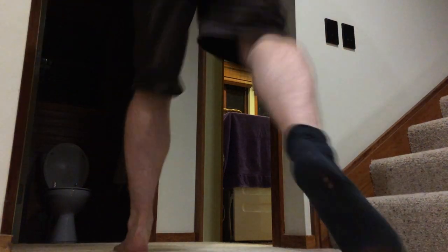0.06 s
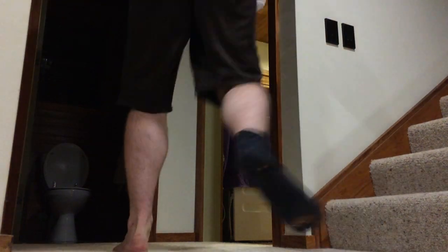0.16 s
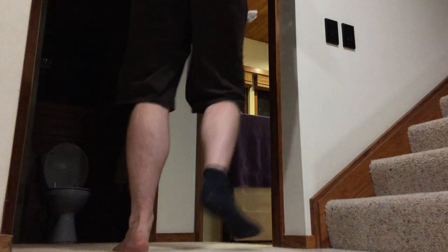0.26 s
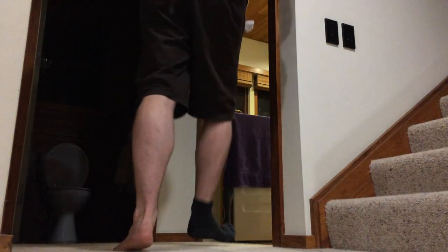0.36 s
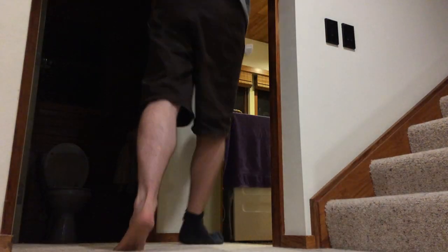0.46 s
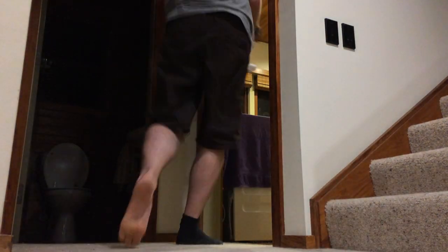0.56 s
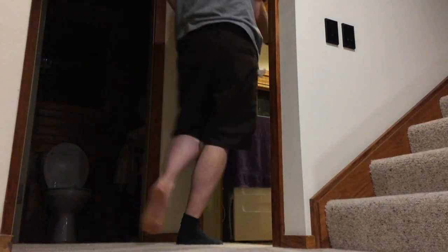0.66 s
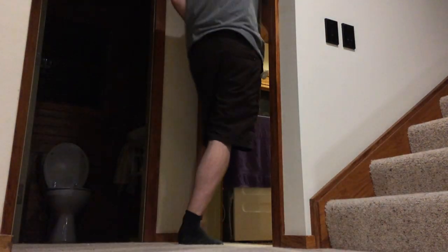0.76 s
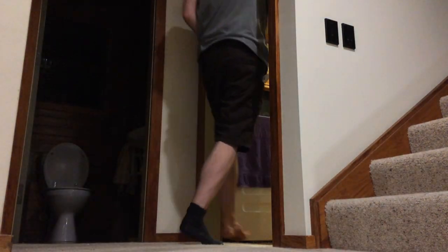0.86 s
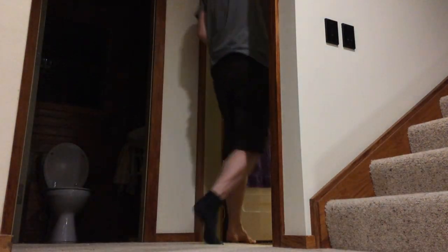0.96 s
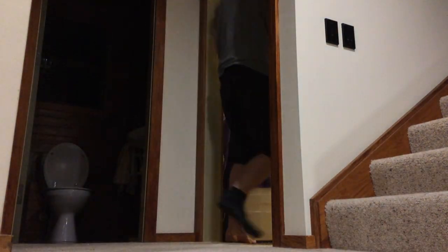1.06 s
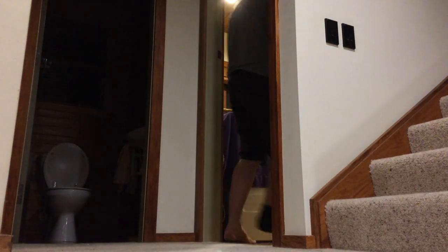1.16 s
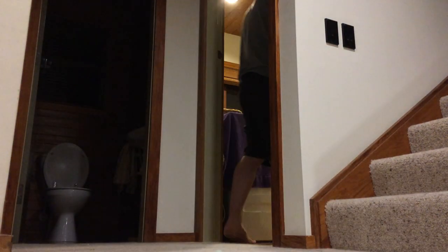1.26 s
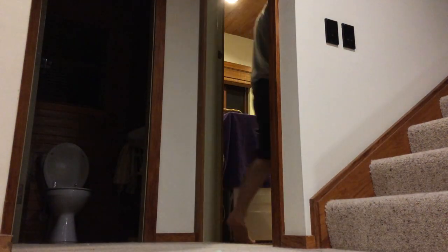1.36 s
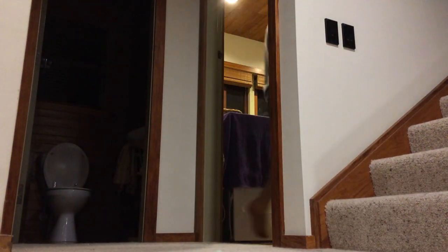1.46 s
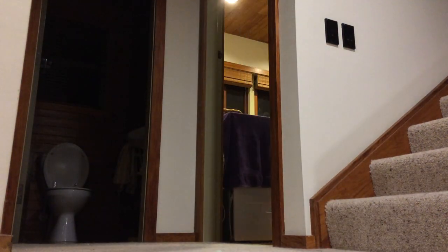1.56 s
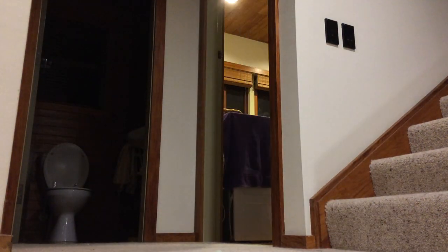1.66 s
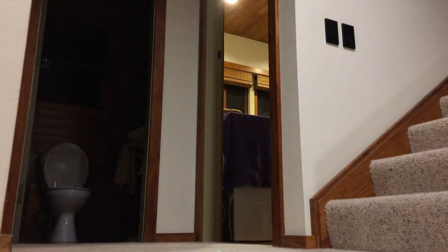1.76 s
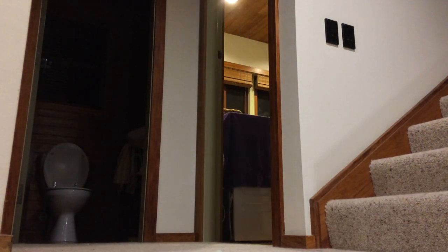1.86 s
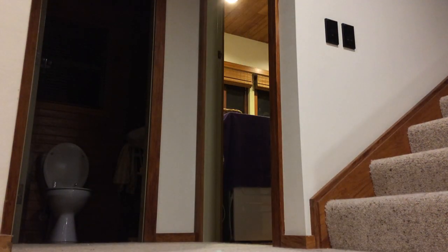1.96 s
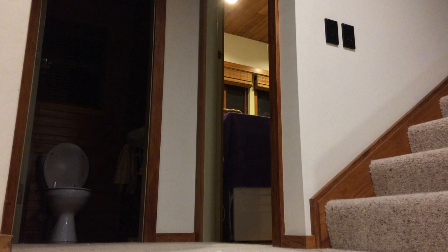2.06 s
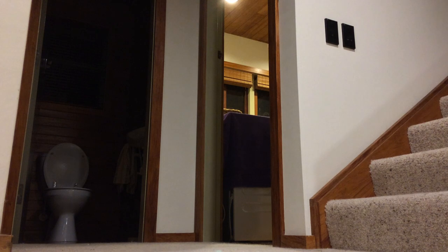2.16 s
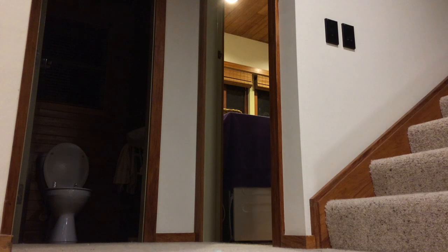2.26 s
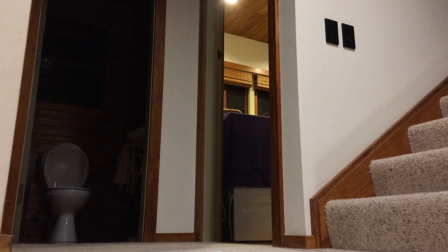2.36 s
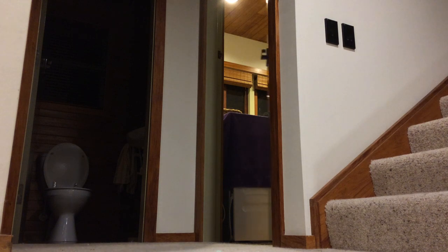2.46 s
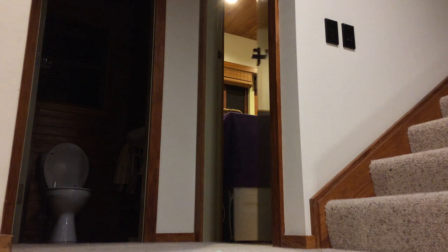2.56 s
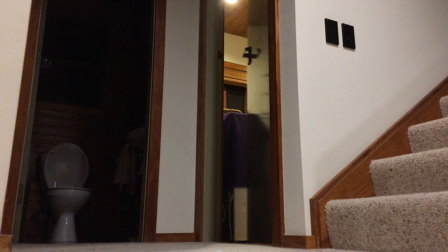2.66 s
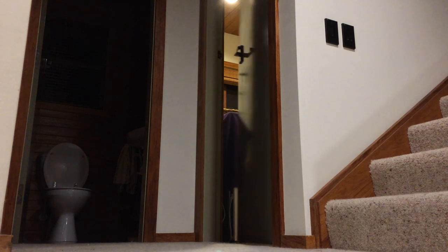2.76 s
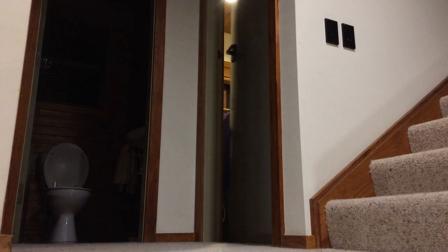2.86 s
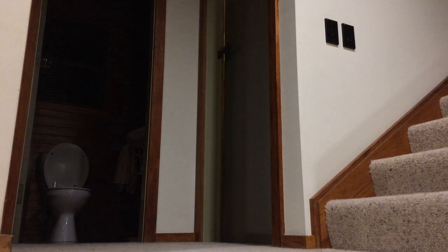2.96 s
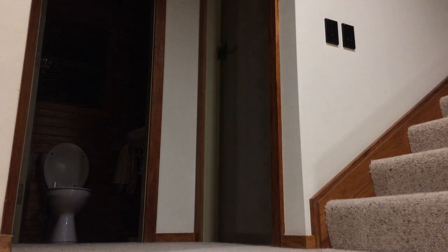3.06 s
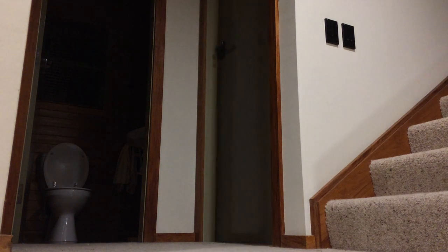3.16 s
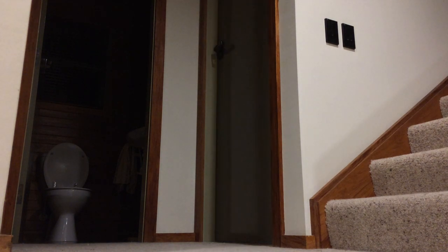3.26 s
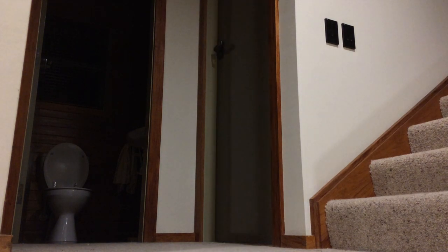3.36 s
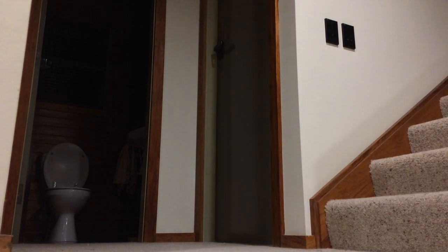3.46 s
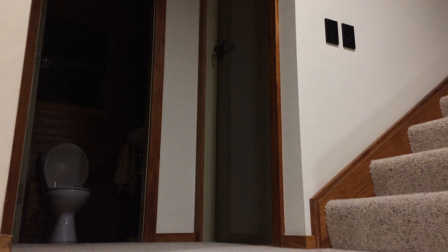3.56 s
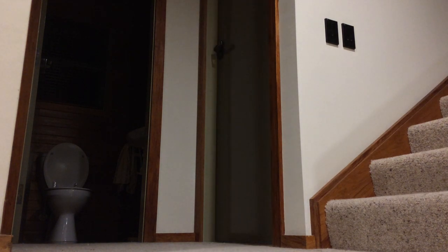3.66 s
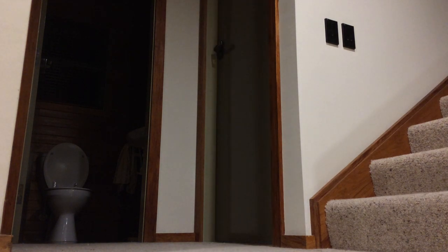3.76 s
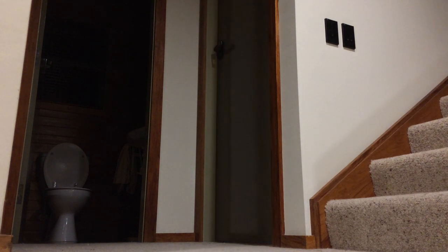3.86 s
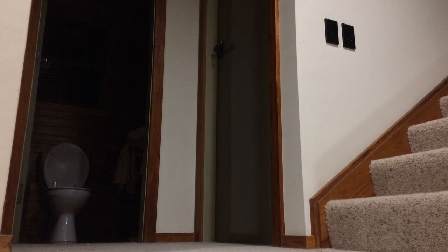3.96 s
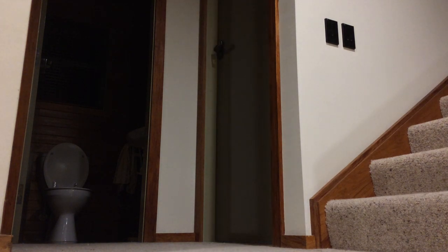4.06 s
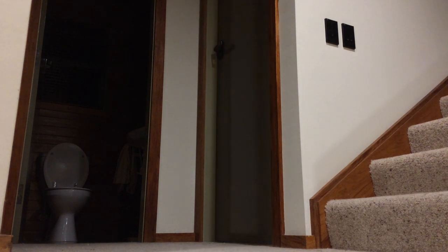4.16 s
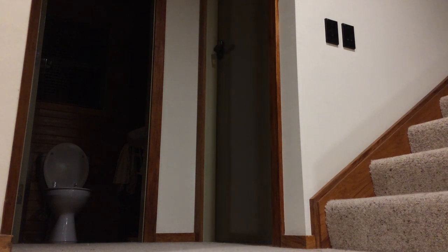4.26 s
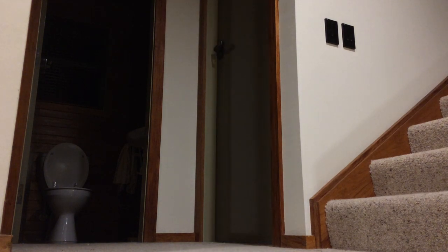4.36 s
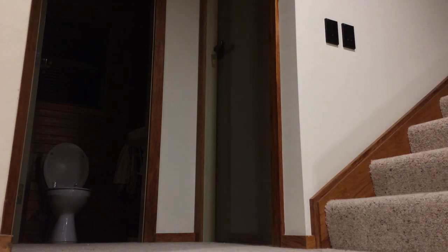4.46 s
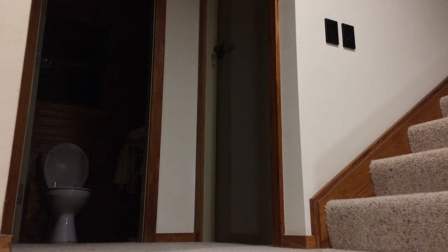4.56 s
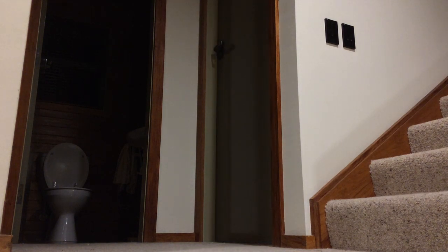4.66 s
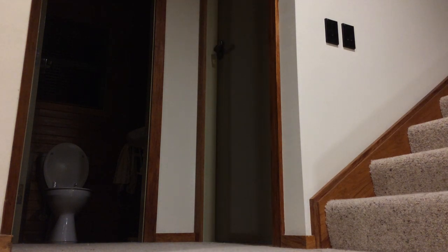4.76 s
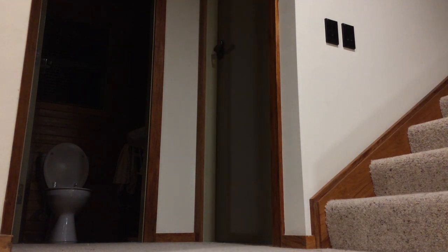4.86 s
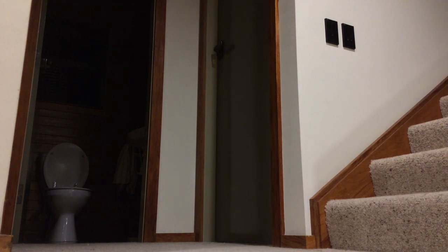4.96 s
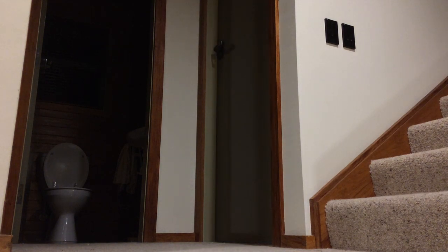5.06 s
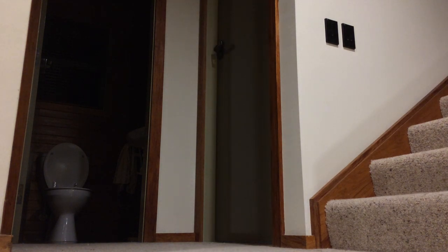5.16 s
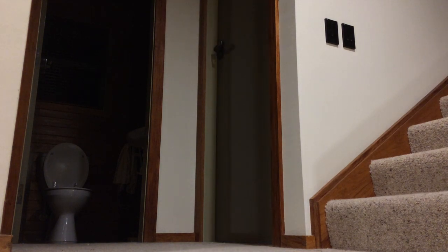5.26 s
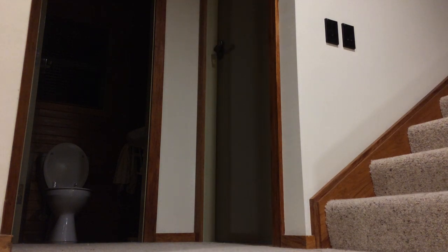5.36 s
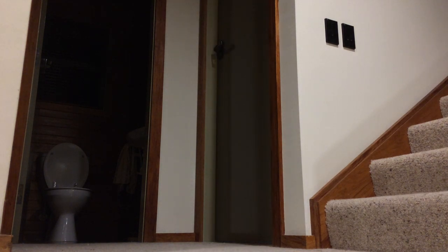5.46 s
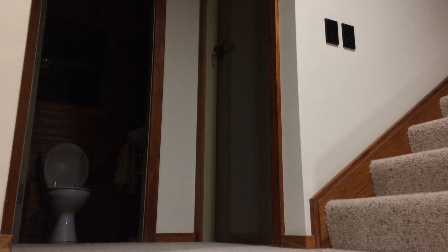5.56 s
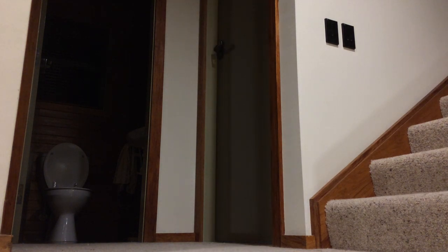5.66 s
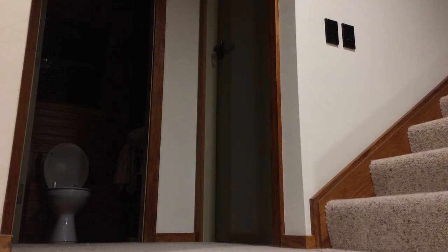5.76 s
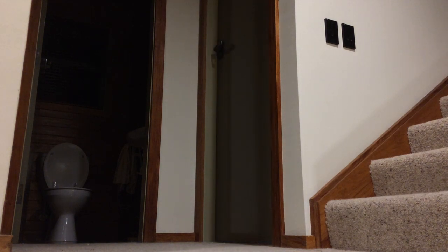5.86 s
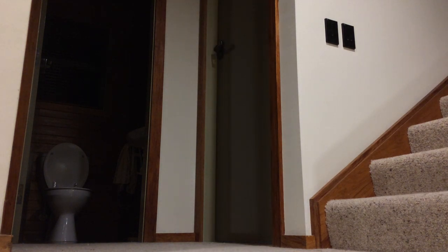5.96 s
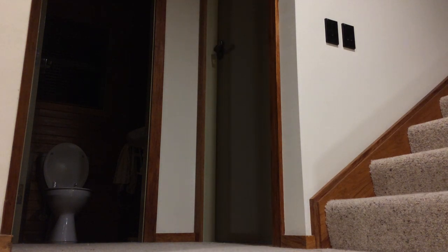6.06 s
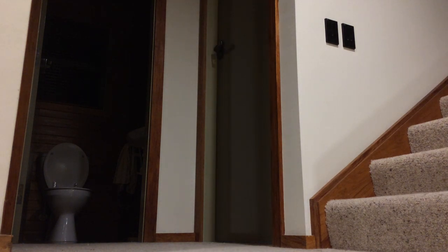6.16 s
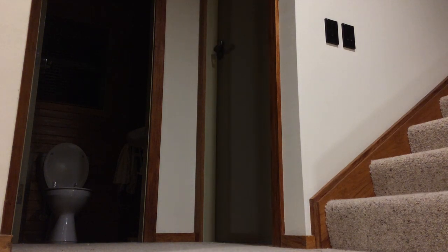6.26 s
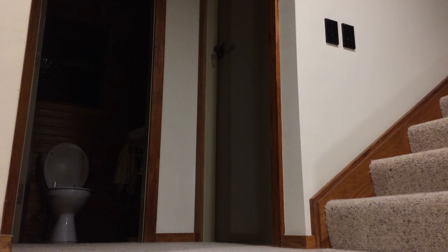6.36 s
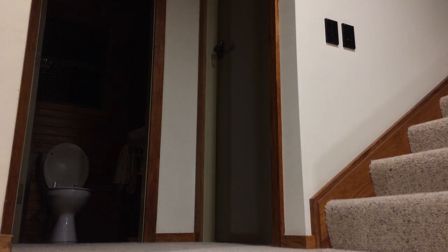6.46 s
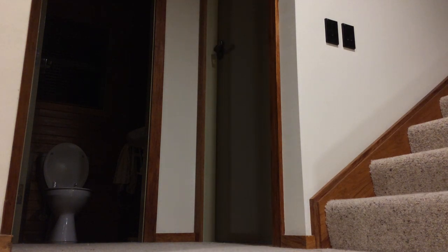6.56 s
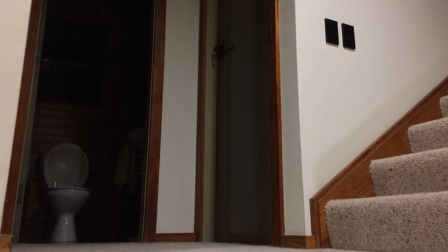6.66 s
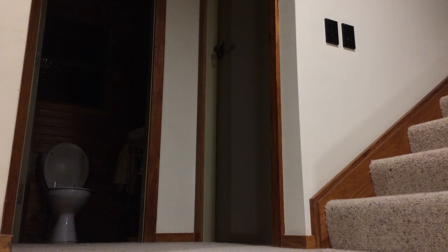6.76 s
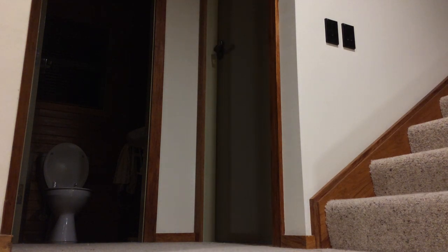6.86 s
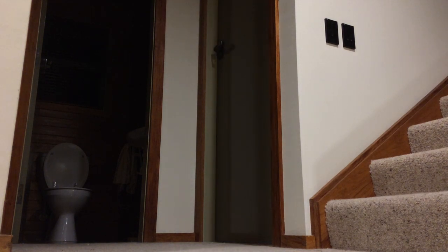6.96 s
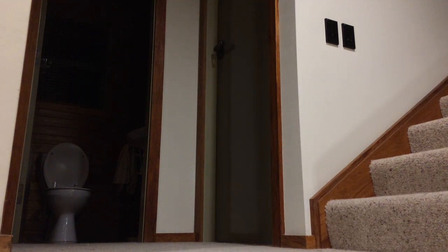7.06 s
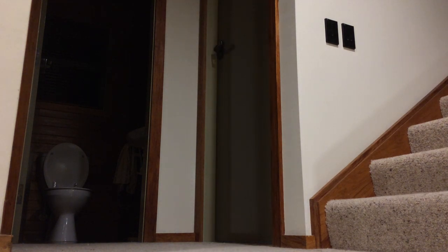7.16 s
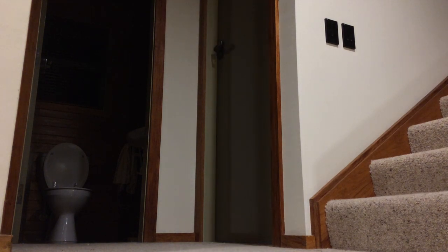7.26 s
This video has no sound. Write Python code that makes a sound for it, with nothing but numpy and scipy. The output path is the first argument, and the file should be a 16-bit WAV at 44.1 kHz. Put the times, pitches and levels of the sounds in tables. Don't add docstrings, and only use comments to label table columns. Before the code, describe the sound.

Someone pads away over creaky carpeted boards, a door rubs faintly, knocks and bangs shut hard, leaving dull thumps behind it in a quiet house.

```python
import sys
import numpy as np
from scipy import signal
from scipy.fft import rfft, irfft
from scipy.io import wavfile
from scipy.ndimage import uniform_filter1d

SR = 44100
rng = np.random.default_rng(int(sys.argv[2]) if len(sys.argv) > 2 else 0)


def to_linear_factor(level_db):
    exponent = np.asarray(level_db, float) / 20
    return 10 ** exponent


def bounce(signal):
    frames = np.transpose(np.atleast_2d(signal))
    limited = np.clip(frames, -1, 1)
    pcm = np.round(limited * 32767).astype(np.int16)
    wavfile.write(sys.argv[1], SR, pcm)


N = 322371
T = np.arange(N) / SR
HALF = SR // 2
T_HALF = T[:HALF]
DECADE = np.log(1000)
SHUT_S = 3.3


def unit(x):
    return x / np.sqrt(np.mean(x ** 2))


def coloured(db_of_hz, size=N):
    hz = np.maximum(np.arange(size // 2 + 1) * SR / size, 1)
    spectrum = rfft(rng.standard_normal(size)) * to_linear_factor(db_of_hz(hz))
    return unit(irfft(spectrum, size))


def table(points):
    hz, db = np.transpose(points)
    return lambda f: np.interp(np.log(f), np.log(hz), db)


def hump(centre_hz, octaves):
    return lambda f: np.maximum(-12 * (np.log2(f / centre_hz) / octaves) ** 2, -150)


def ring(force, modes):
    out = 0
    for k, (hz, db, t60) in enumerate(modes):
        pole = np.exp(2j * np.pi * hz / SR - DECADE / (t60 * SR))
        mode = signal.lfilter([1], [1, -pole], force).imag
        out = out + (-1) ** k * to_linear_factor(db) * mode
    return out


def add(out, s, sound):
    i = int(s * SR)
    out[i:i + len(sound)] += sound[:N - i]


def burst(rise_ms, t60):
    rise = 1 - np.exp(-(T_HALF * 1000 / rise_ms) ** 2)
    shape = rise * np.exp(-DECADE * T_HALF / t60)
    return shape / shape.max()


def thud(out, s, db, hz, t60, rise_ms, way=1, grit=0):
    sag_s = 0.0016 * (1 - np.exp(-T_HALF / 0.0097))
    rough = np.clip(grit + (hz - 70) / 160, 0, .7)
    tone = way * np.sin(2 * np.pi * hz * (T_HALF + sag_s))
    rumble = coloured(hump(hz, 0.46), size=HALF)
    add(out, s, to_linear_factor(db) * burst(rise_ms, t60) * ((1 - rough) * tone + rough * rumble))


# start in seconds, body level in dB, crack level in dB, contact in ms, direction.
LEAF_KNOCKS = [(3.038, -47.5, -77, 0.4, -1), (3.044, -45, -79, 0.31, -1), (3.052, -50, -77.5, 2.3, 1),
               (3.127, -23.5, -13.5, 1.09, -1), (3.1297, -18, -21.5, 0.8, 1), (3.1348, -19, -27, 0.75, 1),
               (3.146, -25.5, -35, 0.19, -1), (3.174, -19, -32.5, 0.54, 1), (3.207, -30, -49, 4.1, -1),
               (3.323, -23.5, -48, 1.6, -1), (3.33, -19.5, -18.5, 1.2, 1), (3.3371, -9.5, -20, 1.1, -1),
               (3.3393, -14, -26, 0.67, -1), (3.348, -14.5, -20.5, 0.7, -1),
               (3.3517, -12.5, -17.5, 0.43, 1), (3.358, -21, -24.5, 1.2, 1), (3.366, -26.5, -31, 1.1, -1)]
# frequency in Hz, level in dB, t60 in seconds.
LEAF_MODES = [(135, -3, 0.15), (161.3, -9, 0.33), (219, 0, 0.053), (275, -1, 0.16), (344.5, -1, 0.17),
              (430.5, -2.5, .1), (507, -2.5, 0.046), (600, -5, 0.032), (760, -8, 0.051), (858, -9, 0.082),
              (925.3, -3, 0.063), (1064, -6, .05), (1238, -7.5, 0.018), (1404, -10, 0.016),
              (1730, -12, 0.0077), (2386, -19.5, 0.027), (2840, -14.5, .04)]
# frequency in Hz, density in dB per Hz.
KNOCK_CRACK = [(180, -20.5), (300, -10), (1060, -9.5), (1460, -13.5), (2280, -19.5), (4500, -16.5),
               (5100, -24.5), (11300, -26), (14500, -34.5), (16000, -56.5)]
# frequency in Hz, density in dB per Hz.
SLAM_CRACK = [(180, -34), (300, -26.5), (470, -15), (689, -19.5), (1000, -9), (1720, -15), (1970, -21.5),
              (2880, -20.5), (5600, -28), (14200, -32.5), (16000, -57)]
RATTLE_S, RATTLE_S_PER_MS = .012, 0.027


def door():
    push, crack = np.zeros(N), np.zeros(N)
    for s, body_db, crack_db, contact_ms, way in LEAF_KNOCKS:
        blow = np.hanning(int(contact_ms * SR / 1000) + 3)
        add(push, s, way * to_linear_factor(body_db) * blow / blow.sum())
        grains = to_linear_factor(4.0 * coloured(hump(250, 1.0), size=HALF))
        splinter = coloured(table(KNOCK_CRACK if s < SHUT_S else SLAM_CRACK), size=HALF)
        rattle = burst(.4, RATTLE_S + RATTLE_S_PER_MS * contact_ms)
        add(crack, s, to_linear_factor(crack_db) * rattle * grains * splinter)
    return ring(push, LEAF_MODES), crack


LATCH_STRIKES = [
    3.129,
    3.176,
]
# frequency in Hz, level in dB, t60 in seconds.
LATCH_MODES = [(2950, -7, .04), (3420, -8, .03), (4020, -6, .03), (4560, 0, .07), (4640, -5, .05),
               (5280, -4, .04)]


def latch():
    tongue = np.zeros(N)
    for s, db in zip(LATCH_STRIKES, (-49, -57)):
        add(tongue, s, to_linear_factor(db) * burst(0.77, .07) * rng.standard_normal(HALF))
    return ring(tongue, LATCH_MODES)


# start in seconds, level in dB, pitch in Hz, rise in ms, direction.
WALL_BOOMS = [(3.04, -52, 71.6, 9.9, 1), (3.138, -19.5, 75.2, 38, 1), (3.327, -7, 69.7, 3.8, 1),
              (3.35, -3.5, 64.96, 1.5, 1), (3.3588, 2.5, 76.3, 3.4, -1), (3.381, -10, 135, 16, 1),
              (3.398, -8.5, 73, 5.7, -1), (3.428, -16.5, 65.8, 10.8, 1), (3.552, -30, 67.24, 15.2, 1),
              (3.629, -36, 73.8, 14, 1), (3.74, -39, 75.75, 19, 1)]
T60_S_PER_RISE_MS = 0.0071
WALL_T60_S = .09


def wall():
    out = np.zeros(N)
    for s, db, hz, rise_ms, way in WALL_BOOMS:
        thud(out, s, db, hz, WALL_T60_S + T60_S_PER_RISE_MS * rise_ms, rise_ms, way)
    return out


# start in seconds, joist
# level in dB, joist pitch in Hz, boards level in dB, rise in ms.
FOOT_CONTACTS = [(0.121, -24.5, 52.7, -42, 3.6), (.144, -25.5, 66, -45, 3.75),
                 (0.181, -32.5, 51.7, -67, 3.9), (0.57, -62, 112, -53.5, 16.7),
                 (1.017, -41.5, 64.4, -49, 5.4), (1.21, -54, 108, -60, 2.8), (1.43, -75, 90, -54, 4),
                 (1.462, -52.5, 90, -58, 4.9), (1.601, -69, 100, -61, 7.6), (1.85, -50.5, 52.5, -55, 19),
                 (2.175, -54, 88, -54, 16), (2.239, -57, 150, -50.5, 28.3), (2.622, -54.5, 82.6, -55, 16),
                 (4.385, -45, 75.2, -51, 16.76), (4.446, -46.5, 48.7, -54.5, 15),
                 (4.904, -51.5, 104, -54.5, 23.7), (4.95, -42, 55, -57.5, 17.8),
                 (5.024, -47, 60.8, -75, 4.8), (5.33, -42.5, 84.5, -65, 9.8), (5.385, -38, 57.3, -67, 10.5),
                 (5.97, -35, 63.26, -54, 16.7), (5.975, -36.5, 124, -61, 20), (6.06, -41, 45.5, -66, 13.4),
                 (6.699, -62, 110.7, -66, 17.4)]
# frequency in Hz, level in dB, t60 in seconds.
NEAR_BOARDS = [(124, -1.5, 0.24), (196.7, -11.5, 0.18), (338.4, -7, 0.12)]
# frequency in Hz, level in dB, t60 in seconds.
BOARDS_BEYOND = [(124, 1, 0.28), (190.8, -2, 0.32), (245, -27, .09)]
JOIST_T60_S = 0.034
WEIGHT_LAG = 1.5


def footsteps():
    out = np.zeros(N)
    for s, joist_db, joist_hz, boards_db, rise_ms in FOOT_CONTACTS:
        weight_s = s + WEIGHT_LAG * rise_ms / 1000
        joist_t60 = JOIST_T60_S + T60_S_PER_RISE_MS * rise_ms
        thud(out, weight_s, joist_db, joist_hz, joist_t60, rise_ms, grit=0.17 * (s > SHUT_S))
        for hz, db, t60 in (NEAR_BOARDS if s < SHUT_S else BOARDS_BEYOND):
            thud(out, s, boards_db + db, hz, t60, rise_ms, grit=0.2)
    return out


# start in seconds, level in dB, pitch in Hz, t60 in seconds.
WOOD_POPS = [(0.3448, -42, 770, 0.0089), (0.3618, -31.5, 745, 0.0057), (.371, -55, 890, 0.021),
             (0.7856, -45.5, 370, 0.03), (.7858, -55, 950, 0.011), (1.014, -51, 470, .03),
             (1.6355, -52, 420, 0.0044), (2.2332, -65, 1100, .01), (3.324, -5, 300, .03),
             (3.3356, -9.5, 1000, 0.017), (3.3385, -12.5, 1200, .014), (3.3431, -19, 756, .02),
             (3.3483, -11, 425, 0.038), (3.3494, -15.5, 894.4, .03), (3.3517, -12.5, 1116, .025)]


def pops():
    out = np.zeros(N)
    for s, db, hz, t60 in WOOD_POPS:
        rise_ms = 480 / hz
        add(out, s, -to_linear_factor(db) * burst(rise_ms, t60) * np.sin(2 * np.pi * hz * T_HALF))
    return out


def puff(out, s, db, hz, octaves, rise_ms, t60):
    add(out, s, to_linear_factor(db) * burst(rise_ms, t60) * coloured(hump(hz, octaves), size=HALF))


# start in seconds, level in dB, centre in Hz,
# width in octaves, t60 in seconds.
METAL_TICKS = [(.892, -47.5, 8950, 0.28, 0.0069), (0.892, -62, 7060, 2.1, 0.15),
               (1.012, -64.5, 9900, 1.5, 0.21), (1.435, -67, 1005, 0.21, 0.52), (1.595, -61, 365, .2, 0.35),
               (1.93, -68.5, 1200, 0.68, 0.064), (3.041, -52, 1218, 1.2, 0.08),
               (3.038, -64.5, 2870, 0.37, 0.22), (3.115, -60, 5000, 2.2, .07),
               (3.312, -50.5, 1797, 1.9, .25), (3.3319, -24.5, 6535, .16, 0.0056),
               (6.685, -73.5, 6490, .03, 0.28), (6.69, -70.5, 4000, 0.51, .26),
               (6.714, -73, 1750, 0.14, 0.27), (6.67, -78, 7860, 0.11, 0.32),
               (7.23, -79, 6400, 0.028, 0.53), (7.268, -75.5, 5830, .06, 0.39)]


def ticks():
    out = np.zeros(N)
    for s, db, hz, octaves, t60 in METAL_TICKS:
        puff(out, s, db, hz, octaves, rise_ms=24 * t60, t60=t60)
    return out


# start in seconds, level in dB, centre in Hz, rise in ms.
CLOTH_SCUFFS = [(0.126, -62, 500, 3.2), (.555, -65, 460, 28), (.64, -70.5, 900, 11), (0.739, -73, 6000, 23),
                (.785, -67, 880, 1.5), (1.012, -65.5, 1150, 0.93), (1.303, -63, 1340, 1.2),
                (1.425, -66, 1090, 2.4), (1.591, -63.5, 1420, 1.2), (1.595, -66.5, 5350, 0.98),
                (1.843, -73, 4000, 4.5), (2.15, -74, 600, 11), (2.232, -61.5, 785, 1.4),
                (2.421, -72, 850, 6.7), (2.62, -70.5, 1090, 1.1), (2.949, -69, 1204, 2.2),
                (3.62, -66.5, 702, 17), (6.6, -76.5, 600, 59), (6.69, -68.5, 935, 20),
                (6.999, -76, 1201, 17), (7.241, -75.5, 1310, 14.5)]


def scuffs():
    out = np.zeros(N)
    for s, db, hz, rise_ms in CLOTH_SCUFFS:
        puff(out, s, db, hz, 1.4, rise_ms, t60=0.34)
    return out


# time in seconds, level in dB.
SWING_PUSH = [
    (1.92, -82),
    (2.024, -74.5),
    (2.126, -75.5),
    (2.239, -60.5),
    (2.368, -64.5),
    (2.518, -72),
    (2.6, -89),
]
# frequency in Hz, level in dB, t60 in seconds.
SWING_MODES = [(150, 0, 0.26), (212, -4.5, .2), (315.3, -10, 0.15), (383, 0.5, 0.26), (500, -14.5, 0.26)]


def swing():
    s, db = np.transpose(SWING_PUSH)
    hum = ring(rng.standard_normal(N), SWING_MODES)
    hum = hum / np.sqrt(uniform_filter1d(hum ** 2, size=4000))
    return to_linear_factor(np.interp(T, s, db, -120, -120) + 6.5) * hum


# time in seconds, level in dB.
BODY_MOTION = [(0.0, -55), (0.33, -64), (0.5, -70.5), (0.69, -54), (0.9, -69.5), (1.11, -58), (1.5, -60.5),
               (1.72, -66.5), (2.2, -58), (2.6, -68), (3.0, -72), (3.72, -64.5), (4.4, -66), (4.75, -72.5),
               (5.6, -70.5), (5.9, -72.5), (6.75, -68.5), (7.31, -69)]
# centre in Hz, width in octaves, level close by in dB,
# level far off in dB, share of the motion.
STIR_LAYERS = [(80, 1.3, -64, -65, 1), (358, 1.8, -66.5, -82, .5), (1700, 1.7, -74, -93.5, 0.2),
               (7478, 1.8, -74.5, -90.5, 0.055)]
START_M, WALK_M_S, SHUT_DOOR_DB = 0.59, 0.8, -12.5


def stir():
    motion_db = np.interp(T, *np.transpose(BODY_MOTION)) + 61.5
    near = START_M / (START_M + WALK_M_S * T)
    near = near * np.where(T > SHUT_S, to_linear_factor(SHUT_DOOR_DB), 1)
    out = np.zeros(N)
    for hz, octaves, close_db, far_db, share in STIR_LAYERS:
        flicker_db = 2.5 * coloured(hump(11, 4.5))
        size = near * to_linear_factor(close_db) + (1 - near) * to_linear_factor(far_db)
        out += size * to_linear_factor(share * motion_db + flicker_db) * coloured(hump(hz, octaves))
    return out


def shudder():
    since_s = np.maximum(T - SHUT_S, 0)
    fall = (T > SHUT_S) * np.exp(-DECADE * since_s / 2.8)
    return to_linear_factor(-48) * fall * coloured(hump(80.5, .35))


# frequency in Hz, density in dB per Hz.
HOUSE_TONE = [(15, -34), (25, -2), (87, -0.5), (166, -15.5), (206, -5.5), (270, -16), (309, -14.5),
              (463, -17.5), (545, -22), (734, -23.5), (13200, -32.5), (16000, -37.5)]


def still_house():
    return to_linear_factor(-71) * coloured(table(HOUSE_TONE))


# frequency in Hz, t60 in seconds.
HALL_DECAY = [(100, 0.75), (300, 0.38), (1000, 0.33), (4000, .33), (12000, 0.24)]


def hall(x):
    tail = 0
    for hz in 63 * 2. ** np.arange(9):
        t60 = table(HALL_DECAY)(hz)
        band = coloured(hump(hz, 1.0), size=HALF)
        tail = tail + np.sqrt(hz / t60) * band * np.exp(-DECADE * T_HALF / t60)
    tail = tail * (1 - np.exp(-T_HALF / 0.002))
    tail = tail * np.exp(-(T_HALF / 0.3) ** 2)
    return signal.fftconvolve(x, tail / np.sqrt(np.sum(tail ** 2)))[:N]


def scene():
    leaf, crack = door()
    tongue = latch()
    low = wall() + footsteps()
    small = pops() + ticks() + scuffs()
    flutter = 1 + 1.1 * coloured(hump(35, 1.2))
    send = to_linear_factor(-5.0) * flutter * (leaf + crack)
    send = send + to_linear_factor(-17.5) * tongue + to_linear_factor(-8.5) * small + to_linear_factor(-12.5) * low
    direct = leaf + crack + tongue + small + low
    background = swing() + stir() + shudder() + still_house()
    return (direct + hall(send) + background)[None]


def low_pass(x):
    return signal.sosfilt(signal.butter(12, 16510, fs=SR, output="sos"), x)


def record(dry):
    heard = signal.sosfilt(signal.butter(2, 32, "high", fs=SR, output="sos"), dry)
    heard = signal.sosfilt(signal.ellip(5, .3, 14, 15250, fs=SR, output="sos"), heard)
    loud = uniform_filter1d(heard[0] ** 2, size=512) > to_linear_factor(-24) ** 2
    hold = np.ones(int(.23 * SR))
    held = signal.fftconvolve(1. * loud, hold)[:N] > .5
    gain_db = -6.0 * uniform_filter1d(1. * held, int(.09 * SR))
    mix = np.tanh(1.119 * heard * to_linear_factor(gain_db)) / 1.054
    return low_pass(mix)


dry = scene()
out = record(dry)
bounce(out)
```